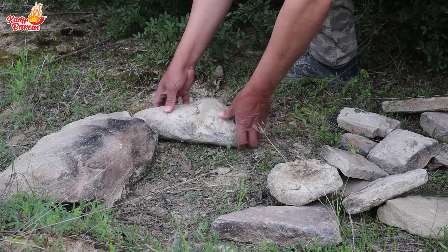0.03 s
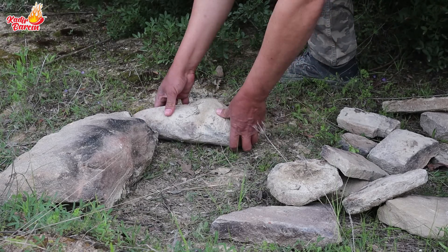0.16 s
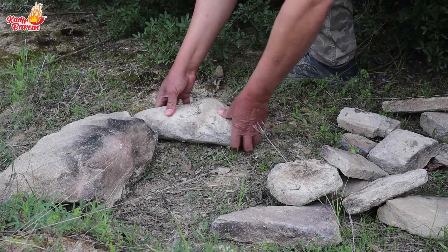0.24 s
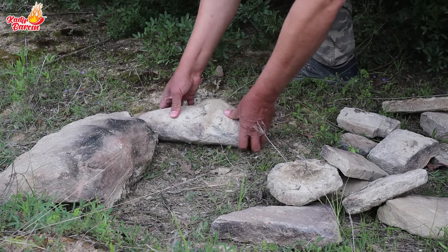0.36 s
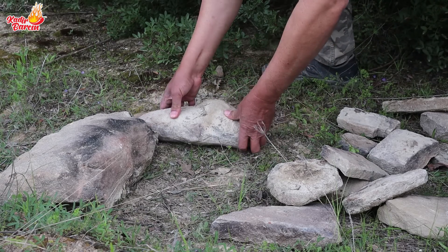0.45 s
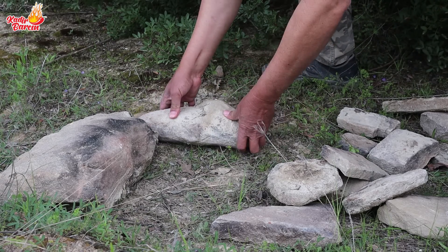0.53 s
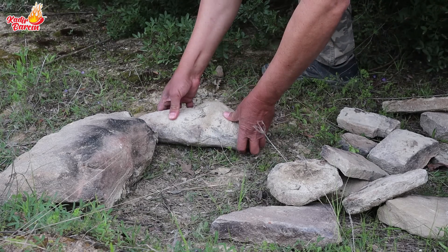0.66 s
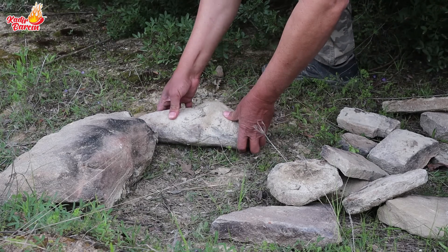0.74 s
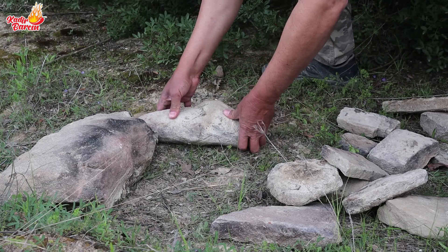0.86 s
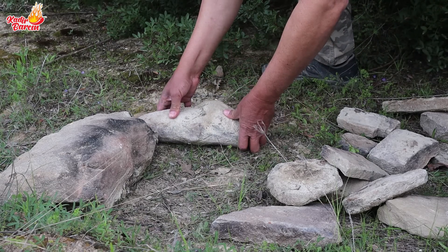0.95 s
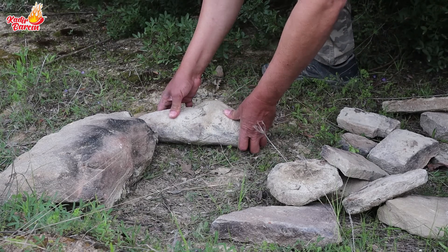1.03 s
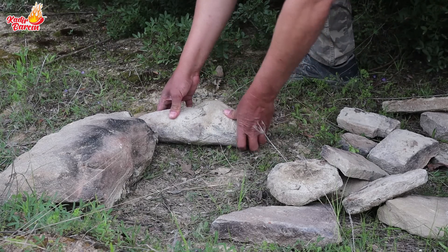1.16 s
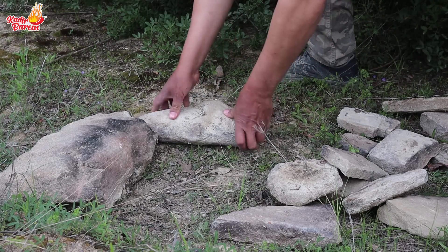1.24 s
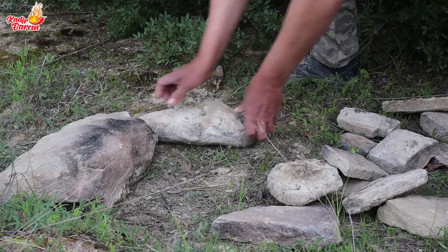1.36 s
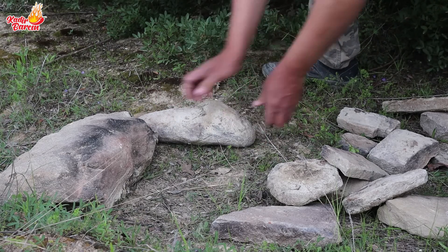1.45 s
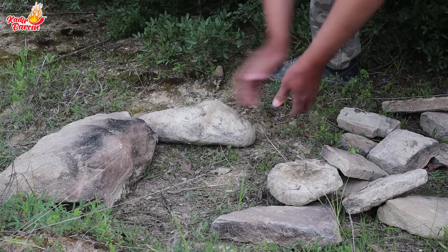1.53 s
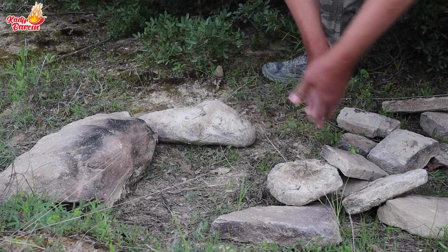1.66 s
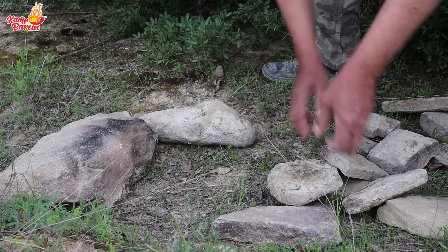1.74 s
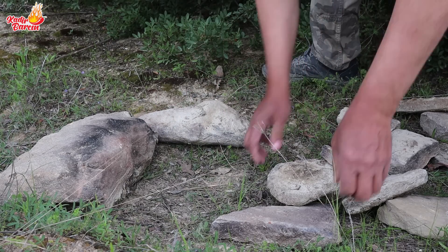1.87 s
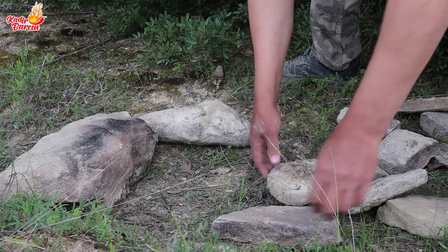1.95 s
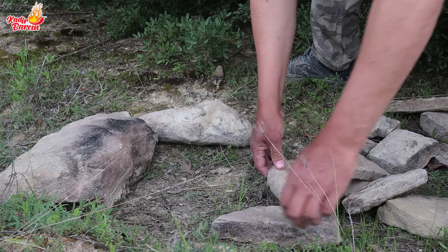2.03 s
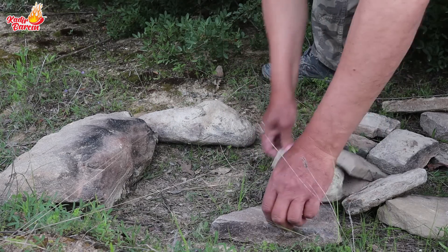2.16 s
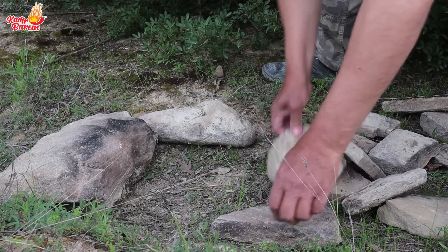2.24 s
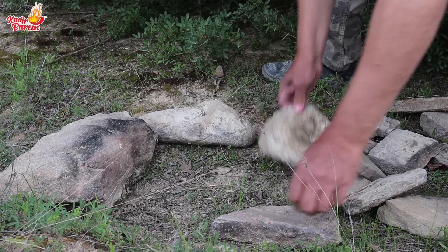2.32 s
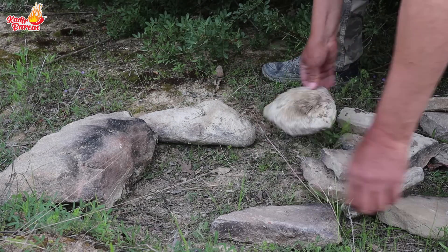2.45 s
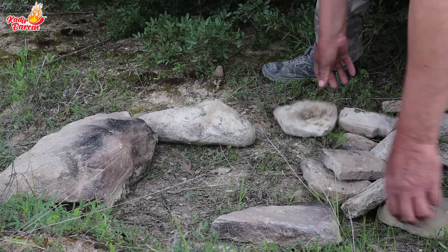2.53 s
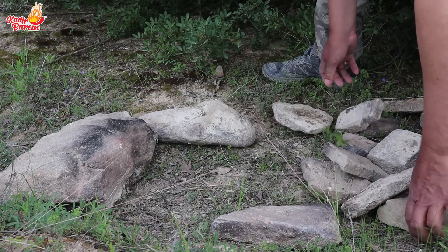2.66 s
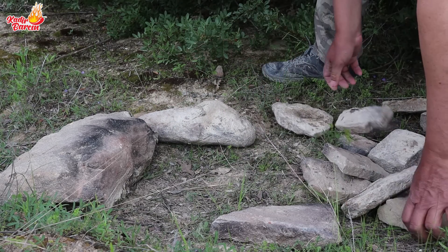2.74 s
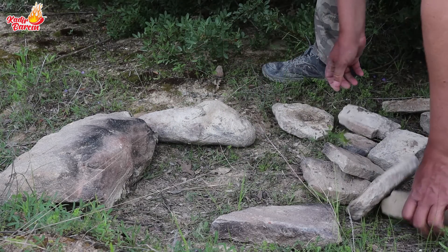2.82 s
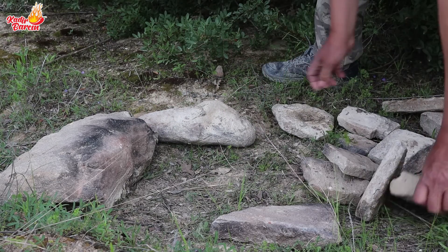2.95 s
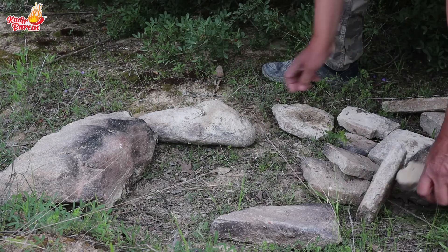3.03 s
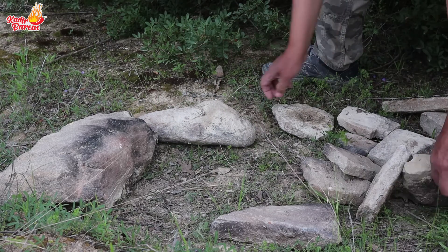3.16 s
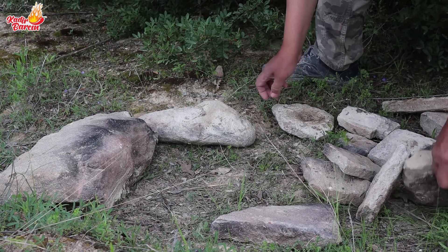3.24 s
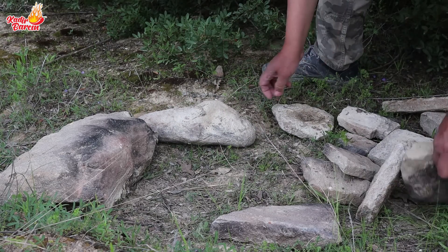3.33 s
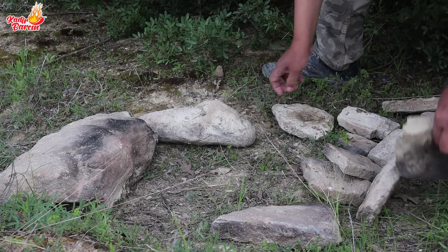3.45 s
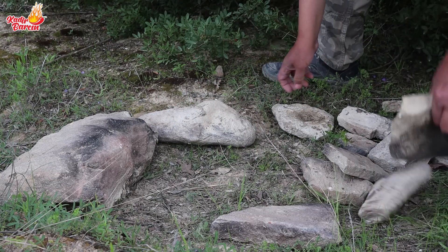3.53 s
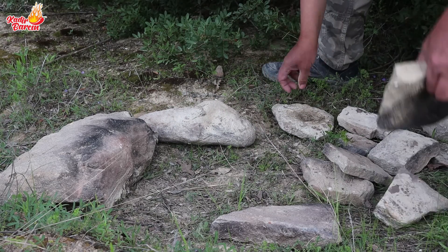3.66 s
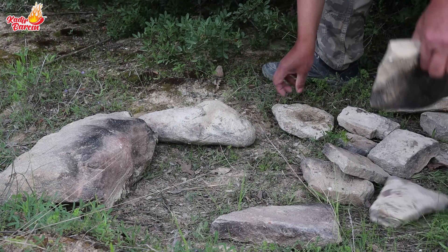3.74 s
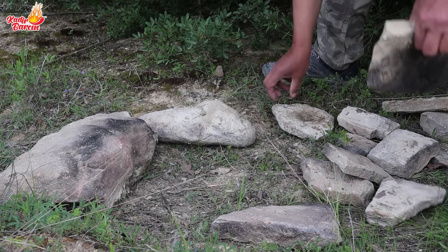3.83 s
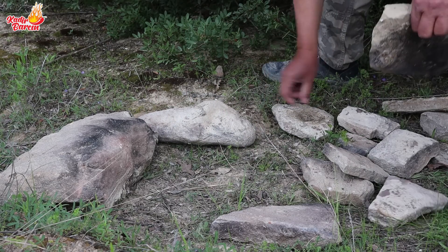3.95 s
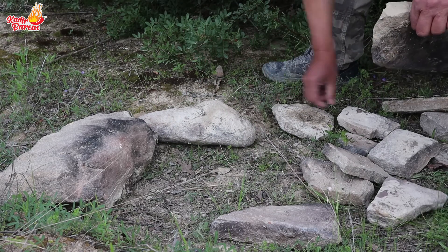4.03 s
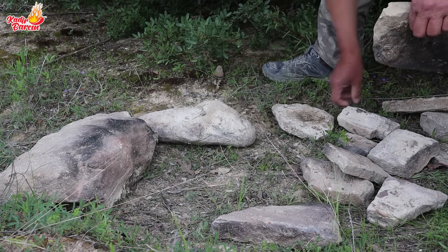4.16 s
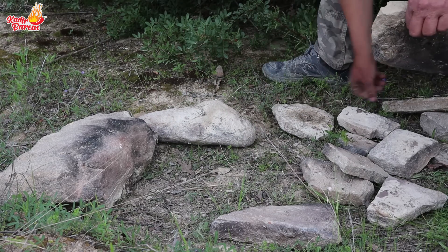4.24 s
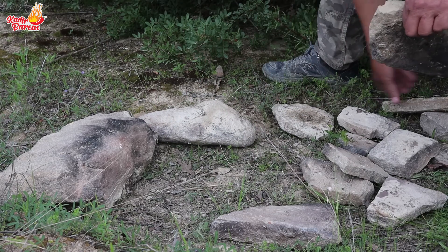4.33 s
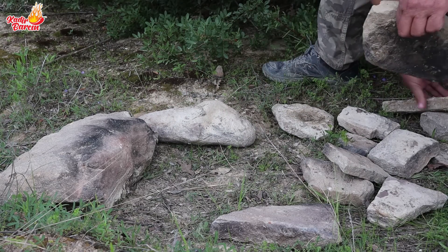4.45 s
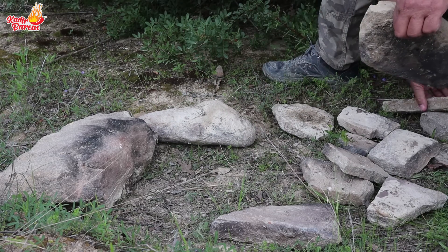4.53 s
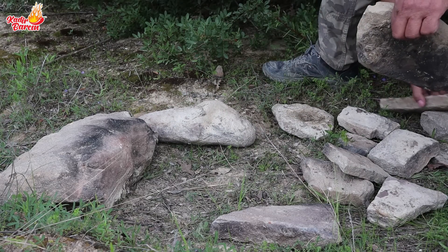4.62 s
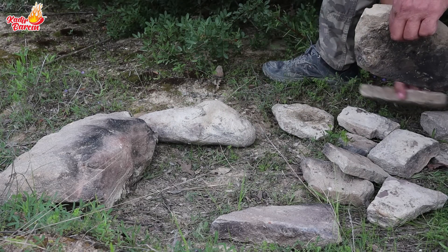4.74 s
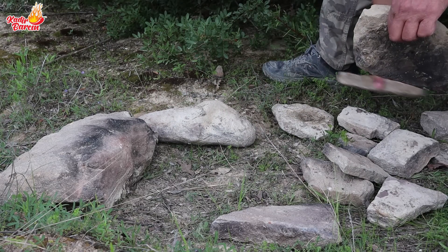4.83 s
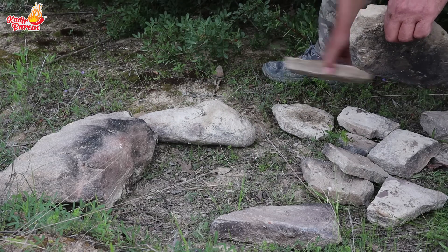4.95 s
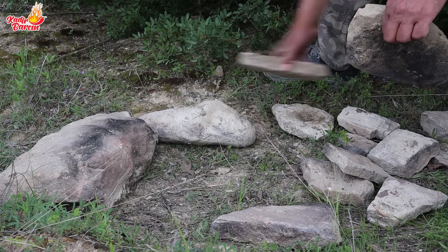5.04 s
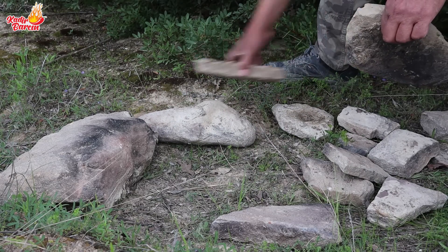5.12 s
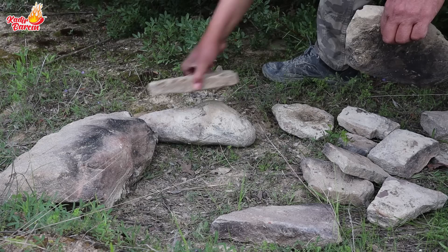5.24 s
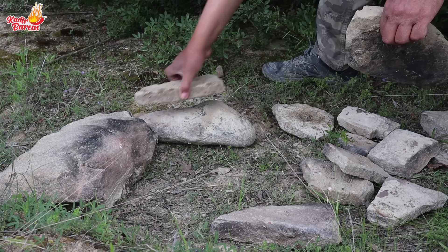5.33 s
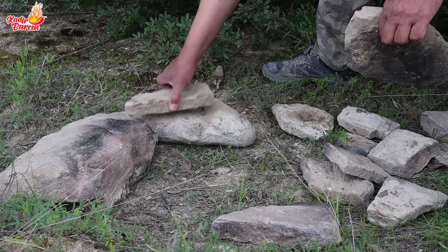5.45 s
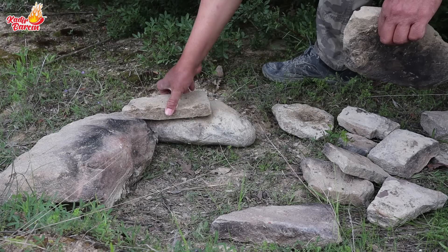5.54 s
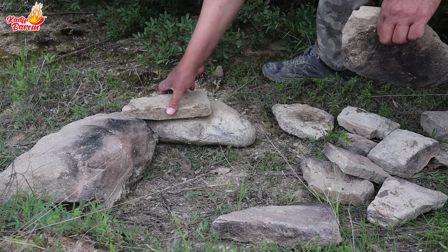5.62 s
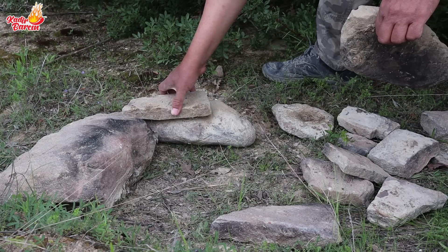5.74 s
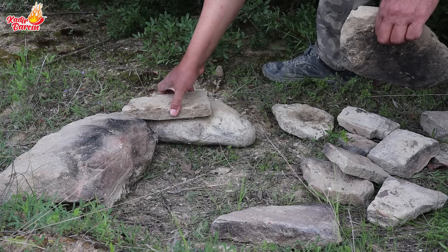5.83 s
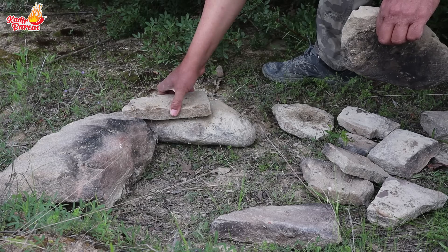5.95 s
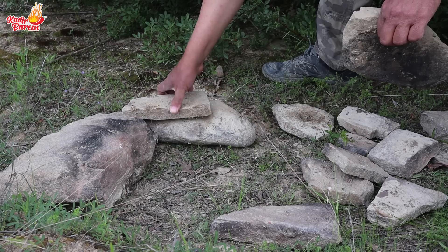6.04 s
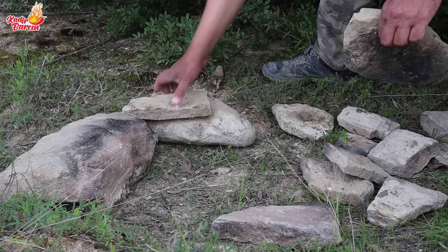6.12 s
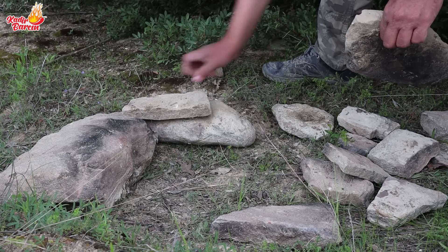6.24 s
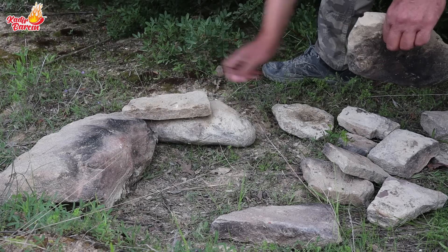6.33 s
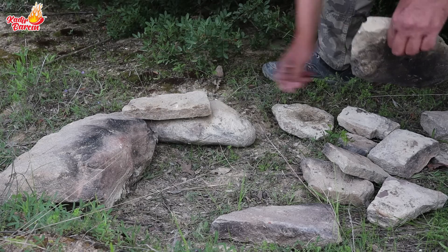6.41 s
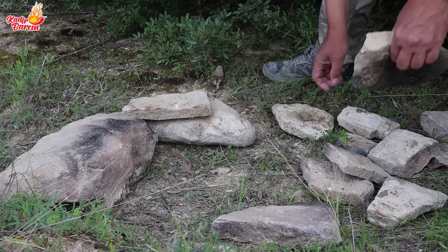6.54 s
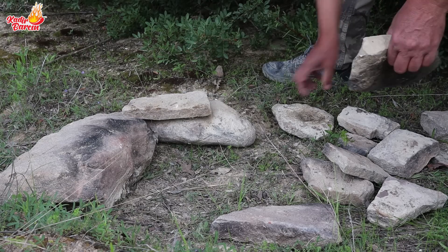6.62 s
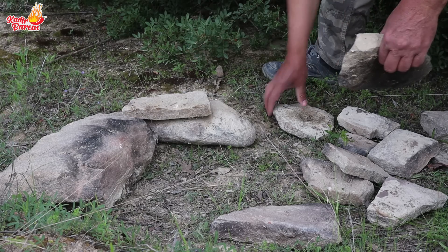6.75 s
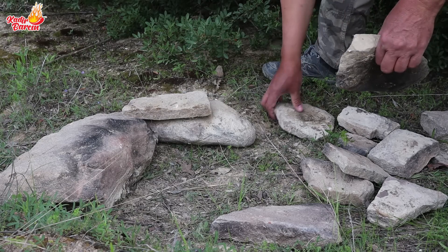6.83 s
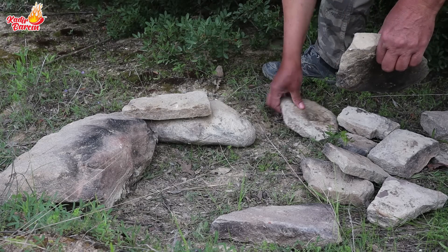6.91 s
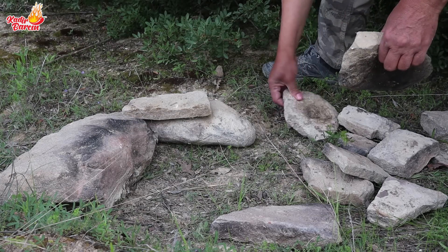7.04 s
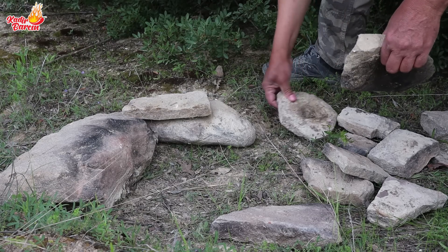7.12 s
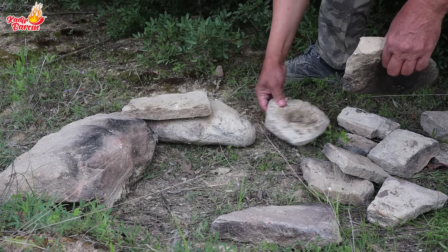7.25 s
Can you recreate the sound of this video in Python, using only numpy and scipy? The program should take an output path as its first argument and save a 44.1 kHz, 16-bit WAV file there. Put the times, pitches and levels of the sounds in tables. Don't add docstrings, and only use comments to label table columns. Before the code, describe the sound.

Hands drag, drop and stack rough rocks on grassy soil, giving dry stone knocks, grit scraping, snapping stalks and one loudest clack late on.

```python
import sys
import numpy as np
from scipy import signal
from scipy.fft import rfft, irfft, next_fast_len
from scipy.io import wavfile

SR = 44100
rng = np.random.default_rng(int(sys.argv[2]) if len(sys.argv) > 2 else 0)


def int16_out(signal):
    q = np.round(np.clip(np.atleast_2d(signal).T, -1, 1) * 32767)
    wavfile.write(sys.argv[1], SR, q.astype(np.int16))


def gain_from_decibels(decibels):
    exponent = np.asarray(decibels, float) / 20
    return 10 ** exponent


N = 321048


def knocks(hits, modes, crush_db, crush_hz):
    out, t = np.zeros(N), np.arange(SR // 6) / SR
    click = signal.lfilter([.25, .5, .25], [1], signal.unit_impulse(len(t)))
    dull = signal.butter(3, [250, crush_hz], "band", fs=SR, output="sos")
    for s, push_db, push_hz, rise_ms, ring_db in hits:
        add(out, s - rise_ms / 1000, push(push_db, push_hz, rise_ms))
        strengths = gain_from_decibels(ring_db + 2.0 * rng.standard_normal(len(modes)))
        sign = 1
        for strength, (hz, mode_db, t60) in zip(strengths, modes):
            add(out, s, sign * strength * gain_from_decibels(mode_db) * ring(click, hz, t60))
            sign = -sign
        crushed = rng.standard_normal(len(t)) * np.exp(-t / .002)
        add(out, s, gain_from_decibels(ring_db + crush_db) * signal.sosfilt(dull, crushed))
    return out


def push(db, hz, rise_ms):
    t = np.arange(int(9 * rise_ms * SR / 1000)) / SR * 1000 / rise_ms
    shape = (t * np.exp(1 - t)) ** 2
    swing = shape * np.cos(2 * np.pi * hz * (t - 1) * rise_ms / 1000)
    return -gain_from_decibels(db) * (swing - shape * swing.sum() / shape.sum())


# mode in Hz, level in dB, t60 in seconds.
SLAB_MODES = [(105, -34, 0.29), (202, -35, 0.2), (760, -21, 0.033), (1207, -2, 0.033), (1500, -19, 0.0044),
              (2260, -9.5, 0.042), (2390, -16, 0.052), (2620, 1, .015), (3094, -8, .03), (4500, -22, 0.021),
              (5960, -24, 0.03), (7040, -17, 0.0049)]
# start in seconds, push in dB, push in Hz, rise in ms, ring in dB.
SLAB_HITS = [
    (5.639, -10.5, 556, 0.64, -24),
    (5.6462, -6, 1290, 0.21, -13.5),
    (5.6475, 0, 1700, 0.45, -12.5),
    (5.6488, -8, 1300, 0.3, -48),
    (5.695, -44, 1500, 0.68, -58),
]


def slab_knocks():
    return knocks(SLAB_HITS, SLAB_MODES, crush_db=0.5, crush_hz=3400)


# mode in Hz, level in dB, t60 in seconds.
ROUND_MODES = [(630, -16.5, 0.054), (970, 0, 0.0033), (1570, -7, 0.024), (3510, -15.5, 0.086),
               (3950, -28, 0.08), (6760, -30, 0.025), (7560, -22.5, 0.052)]
# start in seconds, push in dB, push in Hz, rise in ms, ring in dB.
ROUND_HITS = [
    (2.2108, -14.5, 1170, 0.83, -26.5),
    (2.229, -34, 620, 1.6, -41),
    (2.278, -33.5, 1500, 0.64, -42),
    (2.428, -37, 900, 0.39, -52),
    (2.468, -15.5, 1190, 0.31, -33.5),
    (2.4885, -25.5, 387, 2.4, -57),
    (2.4878, -5, 1390, 0.66, -13.5),
    (2.4925, -15, 1080, 0.57, -26),
]


def round_knocks():
    return knocks(ROUND_HITS, ROUND_MODES, crush_db=4.5, crush_hz=3000)


# mode in Hz, level in dB, t60 in seconds.
DROPPED_MODES = [(172.6, 0, 0.064), (518, -6, 0.039), (1000, -4.5, 0.024), (2480, -3, 0.014),
                 (3390, -20, 0.0092), (4240, -23, 0.13)]
# start in seconds, push in dB, push in Hz, rise in ms, ring in dB.
DROPPED_HITS = [
    (2.6632, -16, 3830, 0.36, -43),
    (2.6647, -15, 490, 0.73, -21),
    (2.6685, -15, 3400, 1.33, -16.5),
    (2.6695, -9, 420, 0.78, -33),
    (2.671, -24, 880, 0.46, -29.5),
    (2.718, -42, 400, 1, -38),
]


def dropped_knocks():
    return knocks(DROPPED_HITS, DROPPED_MODES, crush_db=-4.5, crush_hz=5000)


# mode in Hz, level in dB, t60 in seconds.
BLOCK_MODES = [(748, -10, 0.046), (1540, -3.5, 0.016), (2120, -8, 0.077), (2980, -14.5, 0.086),
               (3410, -24, 0.067), (4660, -11.5, 0.033), (8300, -15, 0.02)]
# start in seconds, push in dB, push in Hz, rise in ms, ring in dB.
BLOCK_HITS = [
    (3.192, -36, 577, 2.2, -41),
    (3.43, -39, 493, 1.5, -51),
    (3.48, -41, 593, 2.2, -59),
    (3.5271, -29, 1300, 0.57, -27.5),
    (3.5283, -12, 754, 0.47, -21),
    (3.538, -21, 736, 0.48, -54),
    (3.685, -36.5, 1900, 1.4, -41),
    (3.763, -35.5, 1140, 0.78, -60),
    (4.0655, -31, 1270, 0.92, -50),
]


def block_knocks():
    return knocks(BLOCK_HITS, BLOCK_MODES, crush_db=-12, crush_hz=3000)


# mode in Hz, level in dB, t60 in seconds.
WEDGE_MODES = [(1000, -11, 0.03), (1900, -5, 0.014), (4030, -11.5, 0.041), (4700, -18, .03),
               (5840, -26, .03)]
# start in seconds, push in dB, push in Hz, rise in ms, ring in dB.
WEDGE_HITS = [
    (2.81, -21.5, 1000, 0.18, -41),
    (2.833, -34, 590, 0.88, -53),
    (2.9382, -18, 1900, 0.32, -33),
    (2.9415, -20.5, 1000, 0.82, -28),
    (2.9466, -14, 1000, 0.54, -18.5),
    (2.9945, -21.5, 1230, 0.32, -59),
    (2.9985, -26, 1150, 0.57, -47),
    (3.0022, -21, 1390, 0.22, -49),
    (3.027, -40, 680, 2.9, -55),
    (3.033, -42, 1190, 0.42, -47),
]


def wedge_knocks():
    return knocks(WEDGE_HITS, WEDGE_MODES, crush_db=2, crush_hz=3000)


def bumps(rows):
    out = np.zeros(N)
    for s, db, hz in rows:
        rise_ms = 1000 * 0.29 * gain_from_decibels(-0.24 * db) / hz
        add(out, s - rise_ms / 1000, push(db, hz, rise_ms))
    return out


# start in seconds, push in dB, push in Hz.
THUDS = [(.0028, -13.5, 120), (0.029, -38, 57.5), (.09, -51, 72.5), (1.702, -48, 183), (2.6726, -12, 159),
         (2.695, -31, 110), (2.71, -23.5, 170), (2.73, -40, 142), (2.945, -35.5, 154), (3.735, -41, 197),
         (3.745, -44, 55), (3.881, -43, 170), (5.652, -26.5, 171)]


def ground_thuds():
    return -bumps(THUDS)


# start in seconds, push in dB, push in Hz.
TAPS = [(.118, -44, 1360), (0.7075, -32, 353), (0.7106, -11.5, 417), (0.718, -26.5, 410),
        (1.017, -40.5, 392), (1.057, -46, 352), (1.6865, -38, 1500), (1.699, -32, 510), (3.468, -43, 620),
        (3.487, -39, 1420), (3.486, -38, 590), (3.209, -39, 700), (3.221, -39, 804), (3.26, -45, 750),
        (3.285, -46, 1300), (3.375, -42, 446), (5.8, -49, 1100), (6.187, -48, 1000), (6.325, -47, 1100),
        (7.166, -49, 1000), (6.232, -47, 824), (6.49, -46, 614), (6.591, -39, 1040), (6.749, -37.5, 1000),
        (6.911, -43, 1200), (7.174, -35.5, 1070)]


def damped_taps():
    return bumps(TAPS)


def sing(length, hz, t60):
    rubbing = grit(SR // 3, 1500, rough_db=3.0) * slide(length, 0.4)
    tone = ring(rubbing + 1e-18, hz, t60)
    loud_part = tone[:int((length + t60 / 6) * SR)]
    return tone / np.sqrt(np.mean(loud_part ** 2) + 1e-20)


def sing_all_modes(slides, modes):
    out = np.zeros(N)
    for s, length, db, near_hz in slides:
        for hz, mode_db, t60 in modes:
            far_db = -15.5 * abs(np.log2(hz / near_hz))
            add(out, s, gain_from_decibels(db - 4.5 + mode_db + far_db) * sing(length, hz, t60))
    return out


# mode in Hz, level in dB, t60 in seconds.
DRAGGED_MODES = [(2420, 4.5, 0.032), (3590, -5, 0.038), (4040, -0.5, 0.083), (4480, -3, 0.016),
                 (4800, -5.5, 0.021), (5840, -13, .024)]
TIPPED_MODES = [(2595, -1, 0.037), (3570, -6, 0.025), (4420, -3.5, 0.019), (5750, -5.5, .035)]
# start in seconds, length in seconds, level in dB, nearest mode in Hz.
DRAGS = [(2.224, 0.086, -49.5, 2600), (2.29, 0.0081, -39.5, 3250), (2.303, 0.019, -40, 4800),
         (2.307, 0.0055, -41.5, 2420), (2.318, 0.035, -49, 2420), (2.33, 0.026, -48, 4930),
         (2.377, 0.0091, -47, 4040), (2.397, 0.0026, -38, 4040), (2.42, 0.01, -49, 4040),
         (2.452, .005, -41, 5840), (2.457, 0.005, -47, 2420)]
TIPS = [
    (6.882, 0.012, -50.5, 2595),
    (6.913, 0.018, -56, 2595),
    (6.93, 0.19, -58.5, 2595),
    (7.081, 0.0063, -42.5, 3570),
    (7.123, .04, -55, 2595),
    (7.171, 0.0077, -39.5, 2900),
    (7.163, .005, -46, 4420),
    (7.188, 0.005, -37.5, 2930),
    (7.198, 0.011, -35.5, 2800),
    (7.2525, 0.0047, -33, 3000),
]


def round_slides():
    return sing_all_modes(DRAGS, DRAGGED_MODES) + sing_all_modes(TIPS, TIPPED_MODES)


# mode in Hz, level in dB, t60 in seconds.
PULLED_MODES = [(540, -0.5, 0.03), (760, 4, 0.016), (1000, 4, 0.011), (1290, 10, .017), (3070, 32, 0.0094)]
# start in seconds, length in seconds, level in dB, nearest mode in Hz.
PULLS = [
    (3.178, 0.126, -44.5, 540),
    (3.3, 0.087, -52, 500),
]


def block_slides():
    return sing_all_modes(PULLS, PULLED_MODES)


# start in seconds, length in seconds, level in dB, mode in Hz.
SINGS = [(0.002, 0.0044, -51.5, 2340), (2.736, 0.013, -58, 2600), (2.748, 0.0037, -56, 3500),
         (3.158, .012, -55.5, 1300), (3.297, 0.019, -63, 2190), (3.268, .004, -60, 3400),
         (3.02, 0.027, -59, 4840), (3.021, 0.01, -59.5, 7700), (.711, 0.0019, -42, 1190),
         (1.696, .004, -46, 1540), (1.703, .003, -46.5, 3180), (3.65, 0.033, -60, 4820),
         (3.676, 0.0061, -52.5, 4870), (3.68, 0.0054, -54, 4030), (4.267, 0.0096, -63.5, 5750),
         (4.331, 0.054, -62.5, 740), (4.446, 0.082, -65.5, 714)]


def singing_grit():
    out = np.zeros(N)
    for s, length, db, hz in SINGS:
        add(out, s, gain_from_decibels(db + 3.5) * sing(length, hz, t60=0.023))
    return out


# start in seconds, length in seconds, level in dB.
SCRAPES = [(0, 0.037, -53), (0.109, 0.064, -59.5), (0.366, 0.13, -61.5), (1.01, 0.14, -60),
           (1.689, 0.03, -47), (2.224, 0.056, -48), (2.288, 0.054, -47), (2.364, 0.034, -52.5),
           (2.421, 0.0081, -43), (2.45, 0.0082, -55), (2.729, 0.034, -51), (2.831, 0.014, -47),
           (3.024, 0.022, -46.5), (3.153, 0.031, -48.5), (3.184, 0.052, -50), (3.238, 0.073, -54),
           (3.313, 0.1, -61), (3.475, 0.02, -49), (3.611, 0.031, -51.5), (3.675, 0.028, -50.5),
           (3.719, 0.046, -49.5), (3.856, 0.21, -57), (6.366, .3, -59), (6.865, 0.045, -59),
           (7.161, 0.035, -56)]
# frequency in Hz, density in dB per Hz.
GRIND = [(88, -35), (150, -3), (290, -4.5), (538, -6), (1280, -5), (3040, -17), (5000, -13.5), (8000, -35)]


def scrapes():
    grain = rms_one(colour(grit(N, 2200, rough_db=2.0), GRIND))
    level = np.zeros(N)
    for s, length, db in SCRAPES:
        add(level, s, gain_from_decibels(db) * slide(length, 0.19))
    return grain * level


# start in seconds, peak in dB, lowest frequency in Hz.
SNAPS = [(0.5104, -32.5, 4500), (1.6904, -29.5, 3000), (2.17, -32, 7040), (2.291, -37, 1100),
         (2.308, -34, 1090), (2.35, -37, 5000), (2.368, -30, 6000), (2.398, -40, 1800), (2.6616, -23, 1180),
         (2.809, -35, 3000), (2.836, -34, 3000), (2.916, -27, 1500), (3.1336, -26, 1800), (3.21, -37, 3000),
         (3.358, -31, 6000), (3.438, -32, 5500), (3.713, -37, 6000), (3.7437, -28, 5000), (3.89, -29, 3980),
         (3.899, -28, 6000), (3.965, -43, 2800), (4.111, -37, 5000), (4.726, -41, 2500), (4.763, -31, 3500),
         (5.646, -26, 3470), (6.9648, -27, 6000), (7.046, -44, 1200), (7.0843, -30.5, 3000),
         (7.189, -38, 905), (1.46, -47.5, 1500), (2.4213, -45, 3000), (2.5401, -34, 4000),
         (2.6403, -35, 5000), (2.6984, -30, 4500), (2.734, -34, 7000), (2.746, -38, 7000),
         (2.772, -43, 7000), (2.784, -39, 7000), (2.824, -40, 4000), (3.319, -44, 3500), (3.789, -46, 6000),
         (5.661, -37, 4000), (6.942, -39, 6500), (7.219, -38, 3500), (7.23, -43, 5000)]


def snaps():
    out, t = np.zeros(N), np.arange(SR // 60) / SR
    for s, db, low_hz in SNAPS:
        crack = between(grit(len(t), 15000, rough_db=0.5) * np.exp(-t / 0.001), low_hz)
        add(out, s, gain_from_decibels(db) * crack / np.abs(crack).max())
    return out


# start in seconds, length in seconds, level in dB, lowest frequency in Hz.
BRUSHES = [(0, 0.026, -44, 1710), (0.378, 0.16, -52, 1320), (0.241, 0.059, -57, 1500),
           (0.679, 0.041, -54.5, 2480), (1.696, 0.034, -42.5, 2600), (1.714, 0.078, -46, 3750),
           (2.214, 0.11, -49.5, 895), (2.252, 0.024, -53, 3000), (2.301, 0.029, -47.5, 1600),
           (2.396, 0.0077, -46, 1800), (2.529, 0.096, -48, 2200), (2.659, 0.018, -44, 1490),
           (2.664, .016, -45, 4000), (2.699, 0.035, -49, 3000), (2.732, 0.059, -53.5, 6500),
           (2.734, 0.017, -53, 1000), (2.911, 0.0086, -48, 1500), (2.921, 0.053, -47.5, 3000),
           (3.673, 0.031, -50.5, 1600), (3.717, 0.044, -46.5, 2330), (3.869, 0.082, -52.5, 1780),
           (3.928, 0.14, -54, 1500), (4.545, 0.058, -57, 1680), (4.716, 0.034, -51, 2480),
           (5.184, 0.074, -59, 6000), (6.477, 0.26, -52.5, 1500), (7.037, 0.04, -53.5, 2500),
           (2.236, 0.064, -57, 5500), (2.337, 0.018, -53, 5500), (2.368, 0.026, -52, 2500),
           (2.424, 0.013, -54, 2500), (2.455, 0.0065, -49, 2500), (3.19, 0.055, -54, 2000),
           (3.749, .014, -54, 2000), (6.93, .17, -57.5, 5500), (7.082, .014, -52.5, 5500),
           (7.166, 0.075, -56.5, 4500), (7.249, .016, -51, 4500)]


def brushes():
    out, t = np.zeros(N), np.arange(SR // 3) / SR
    for s, length, db, low_hz in BRUSHES:
        fade = gain_from_decibels(5.5 * (.5 - t / length))
        shape = slide(length, min(4 * length + .1, 1))
        hiss = between(grit(SR // 3, 11000, rough_db=2.0) * fade * shape, low_hz)
        add(out, s, gain_from_decibels(db) * hiss)
    return out


# time in seconds, level in dB.
BUSTLE = [(0.0, -57), (0.34, -62.5), (1.03, -62), (2.15, -59.5), (2.43, -55.5), (2.78, -53.5), (3.18, -52),
          (3.6, -54.5), (4.3, -60.5), (5.0, -60), (5.63, -65), (6.35, -64), (6.9, -57), (7.28, -56.5)]
# frequency in Hz, density in dB per Hz.
RUSTLE = [(880, -44), (1500, -4), (3400, -5), (5190, -9.5), (8290, -4.5), (10200, -9), (13700, -8.5),
          (15500, -13)]


def stir():
    bustle_db = in_time(BUSTLE)
    soil = rms_one(colour(grit(N, 1500, rough_db=3.0), GRIND))
    grind = soil * gain_from_decibels(bustle_db + 2.0 * drift(25) - 5.0)
    patches = grit(N, 6000, rough_db=-1.5) * gain_from_decibels(2.0 * drift(36) + 10.0)
    crackle = grit(N, 60, rough_db=0.0) * gain_from_decibels(-28.0)
    rustle = rms_one(colour(patches + crackle, RUSTLE)) * gain_from_decibels(bustle_db - 1.8)
    return grind + rustle


# time
# in # seconds, level in dB.
FAR = [(0.0, -42.5), (0.34, -61), (1.03, -61), (2.5, -56.5), (4.3, -64.5), (5.63, -57), (7.28, -65)]
# frequency in Hz, density in dB per Hz.
DRONE = [(20, -14), (60, 0.5), (90, 5.5), (125, -10), (200, -31)]


def far_drone():
    return rms_one(colour(rng.standard_normal(N), DRONE)) * gain_from_decibels(in_time(FAR) - 2.0)


# frequency in Hz, density in dB per Hz.
AIR = [(12, -51), (20, -13), (92, -3), (157, -7.5), (450, -11), (1160, -14), (1870, -18.5), (15500, -28.5)]


def open_air():
    level_db = -55 - 1.0 + 1.35 * drift(3.4)
    return gain_from_decibels(level_db) * rms_one(colour(rng.standard_normal(N), AIR))


# frequency in Hz, density in dB per Hz.
PREAMP = [(60, -31.5), (200, 2), (800, -0.5), (1500, -3.5), (5000, 0), (15000, -2)]


def preamp_hiss(channels):
    return np.array([gain_from_decibels(-68) * rms_one(colour(rng.standard_normal(N), PREAMP)) for _ in range(channels)])


def rms_one(x):
    return x / np.sqrt(np.mean(x ** 2) + 1e-20)


def colour(x, points):
    hz, level_db = np.transpose(points)
    size = next_fast_len(N)
    log_hz = np.log(np.maximum(np.fft.rfftfreq(size, 1 / SR), 1))
    gain = gain_from_decibels(np.interp(log_hz, np.log(hz), level_db))
    return irfft(rfft(x, size) * gain, size)[:N]


def between(x, low_hz):
    band = [low_hz, min(5.9 * low_hz, 19000)]
    return signal.sosfilt(signal.butter(2, band, "band", fs=SR, output="sos"), x)


def drift(rate):
    r = np.exp(-80 * np.pi * rate / SR)
    slow = signal.lfilter([1], [1, -2 * r, r * r], rng.standard_normal(N // 40 + 2002))[2000:]
    return np.interp(np.arange(N) / 40, np.arange(len(slow)), rms_one(slow))


def grit(size, per_s, rough_db):
    sizes = gain_from_decibels(rough_db * np.minimum(rng.exponential(1, size), 4)) * rng.standard_normal(size)
    return rms_one(sizes * (rng.random(size) < per_s / SR))


def ring(clicks, hz, t60):
    r, w = gain_from_decibels(-60 / (max(t60, .004) * SR)), 2 * np.pi * hz / SR
    return signal.lfilter([0, np.sin(w)], [1, -2 * r * np.cos(w), r * r], clicks)


def slide(length, edge):
    shape = signal.windows.tukey(max(int(length * SR), 8), edge)
    return np.pad(shape, (0, SR // 3 - len(shape)))


def in_time(rows):
    return np.interp(np.arange(N) / SR, *np.transpose(rows))


def add(out, s, sound):
    at = round(s * SR)
    sound = sound[max(-at, 0):N - at]
    out[max(at, 0):max(at, 0) + len(sound)] += sound


def scene():
    stones = slab_knocks() + round_knocks() + dropped_knocks() + block_knocks() + wedge_knocks()
    bass_cut = signal.butter(2, 75, "high", fs=SR, output="sos")
    blows = signal.sosfilt(bass_cut, stones + damped_taps() + ground_thuds())
    slides = round_slides() + block_slides() + singing_grit() + scrapes()
    capsule = [(6000, 2.5), (8500, 7), (11000, -2.0), (14000, 3.0), (16000, -6)]
    bright = colour(snaps() + brushes(), capsule)
    whole = blows + slides + bright + stir() + far_drone() + open_air()
    return np.array([whole, whole])


def low_pass(x):
    return signal.sosfilt(signal.butter(12, 16420, fs=SR, output="sos"), x)


def record(dry):
    top_cut = signal.ellip(10, .5, 60, 16050, fs=SR, output="sos")
    cut = signal.sosfilt(top_cut, dry + preamp_hiss(len(dry)))
    return low_pass(np.clip(cut, -1, 1))


dry = scene()
out = record(dry)
int16_out(out)
```